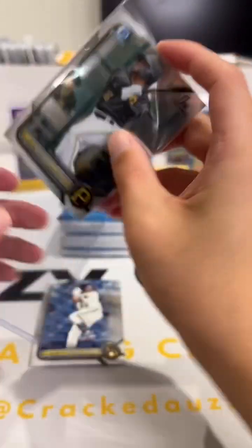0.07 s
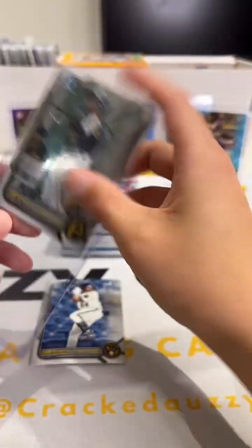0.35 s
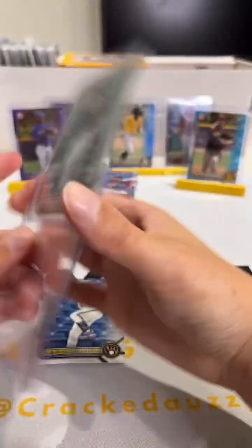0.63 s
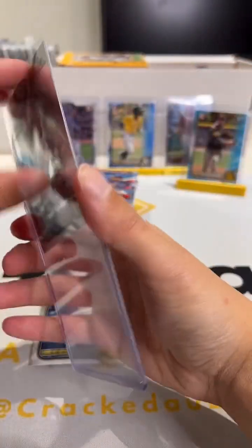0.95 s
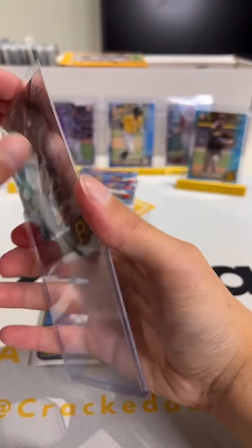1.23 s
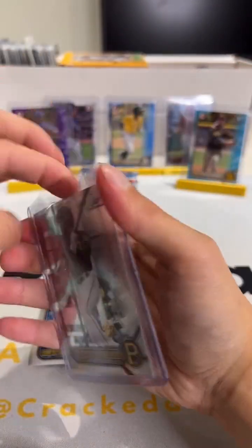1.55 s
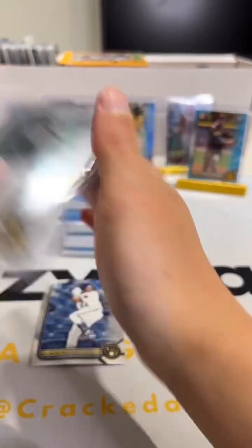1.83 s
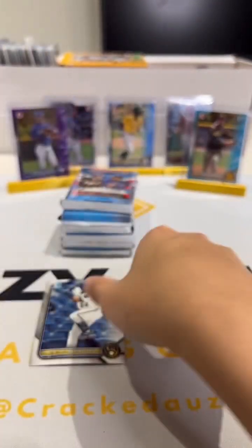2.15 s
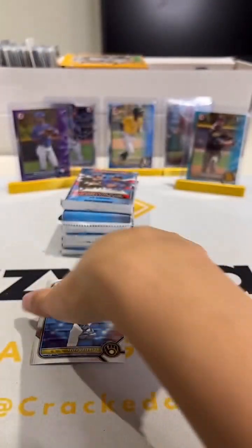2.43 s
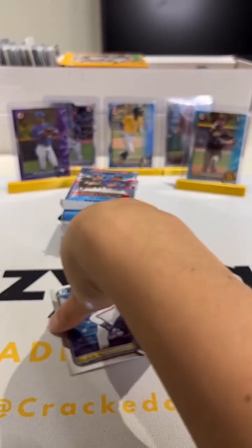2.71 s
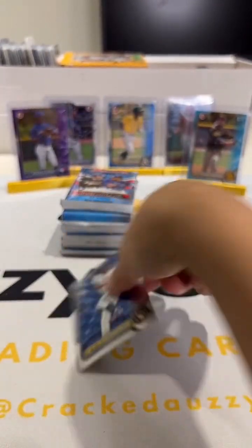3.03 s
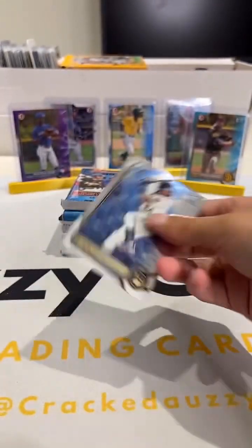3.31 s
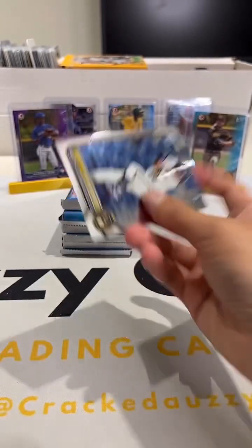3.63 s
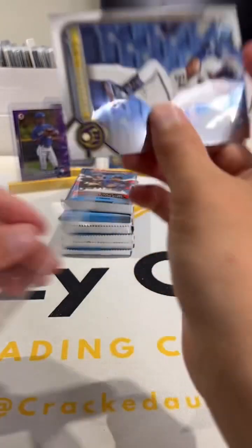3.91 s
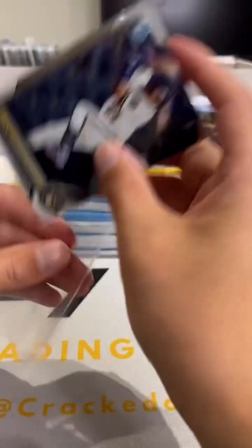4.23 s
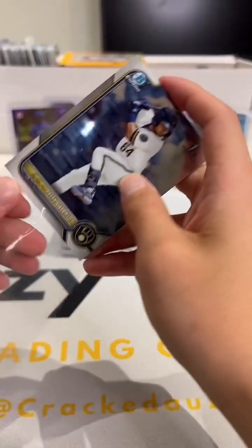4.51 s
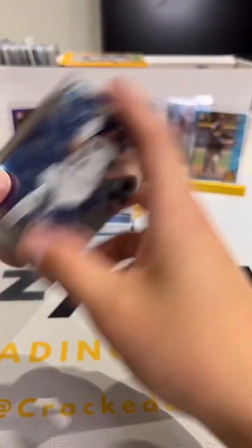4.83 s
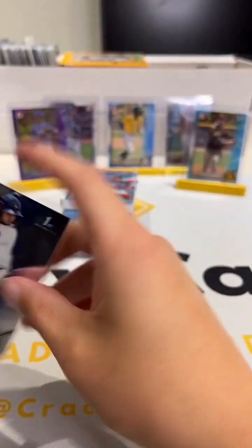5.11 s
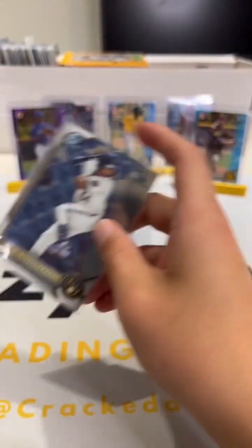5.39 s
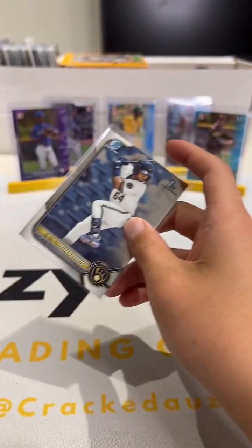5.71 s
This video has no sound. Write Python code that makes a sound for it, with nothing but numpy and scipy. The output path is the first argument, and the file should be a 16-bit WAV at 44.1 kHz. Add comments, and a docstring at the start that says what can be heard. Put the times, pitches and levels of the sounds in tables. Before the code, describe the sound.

A low, steady rumble fills a small room, and everything is heard up close. For the first second or so, a trading card and its plastic rustle softly, with light clicks and a faint squeak. At about 1.4 seconds the card hits the end of a stiff plastic holder with a loud, sharp clack, the loudest sound, followed by a brief scrape. At 2.3 seconds the holder is set down with a hard click, a scrape and a table thump. A hand thumps the table near 2.85 seconds, and the next card slides up with faint squeaks and ticks. From 3.6 to 5.2 seconds, crisp clicks, short scrapes and rustles come in clusters as it is worked into a thin sleeve, busiest around 4.3 and 5.1 seconds. A few soft, dull bumps and faint rubbing close things out by about 5.7 seconds.

```python
"""Soft rustling and light clicks come first, over a low rumble: cards are being sleeved in a small room.
A trading card slides into a stiff plastic holder and hits the end with a loud clack. The holder is put
down and a hand lands on the next card, each thumping the table. That card is picked up and worked into
a thin sleeve. All along, edges click and scrape, and rubbing makes rustles and faint squeaks."""
import sys
import numpy as np
from scipy import signal
from scipy.fft import rfft, irfft
from scipy.io import wavfile
from scipy.ndimage import uniform_filter1d, minimum_filter1d

SR = 44100
rng = np.random.default_rng(int(sys.argv[2]) if len(sys.argv) > 2 else 0)


def put_to_file(sound):
    """Save the sound as 16-bit audio at rate SR, in the file named by the first command-line argument."""
    columns = np.atleast_2d(sound).T  # one column per channel
    safe = np.clip(columns, -1, 1)
    whole_steps = np.round(safe * 32767)
    wavfile.write(sys.argv[1], SR, whole_steps.astype(np.int16))


N = 253575  # samples: 5.75 seconds

# how low and high pitches are balanced in the room's rumble: pitch_hz, gain_db
RUMBLE_TONE = [(15, -69), (25, -7.5), (75, -1), (156, -1), (237, -10), (370, -8), (609, -20), (676, -17),
               (750, -28.5), (1000, -23), (1520, -28.5), (3250, -32.5), (5340, -37.5), (7310, -38),
               (13000, -50.5)]
# how long the room echoes (a fade time is the time to drop by 60 dB): pitch_hz, fade_s
ROOM_FADES = [(100, 0.48), (350, 0.38), (900, 0.37), (2100, 0.49), (6000, 0.33), (12000, 0.43)]
# cards and fingers slide over plastic and table: middle_s, half_length_s, level_db, brightness_db
SLIDES = [(0.095, 0.16, -61.5, 6), (0.251, 0.23, -67, -1), (.372, 0.06, -59.5, 5.5),
          (0.478, 0.0084, -54, 6), (0.795, 0.043, -57.5, 3.5), (0.989, .05, -57.5, 1),
          (1.153, 0.39, -70, 4), (1.397, 0.019, -38, -4.5), (1.728, 0.015, -49, 2), (1.892, 0.028, -58, 2),
          (1.954, 0.024, -61, -1), (2.185, 0.042, -65.5, 3), (2.702, 0.1, -63.5, 1),
          (2.981, 0.1, -57.5, -3.5), (3.167, 0.073, -56, -3.5), (3.308, 0.08, -59.5, -2),
          (3.81, 0.037, -63, -7.5), (4.465, 0.1, -67, 5), (4.584, 0.064, -54, -3.5),
          (4.847, 0.028, -56, -0.5), (5.018, 0.15, -57.5, 7), (5.135, 0.018, -50.5, 0.5),
          (5.256, 0.058, -62, 1), (5.639, 0.027, -64.5, -12.5), (5.72, 0.089, -76.5, -17.5)]
# the tone of sliding: pitch_hz, gain_db
SLIDE_TONE = [(200, -11), (700, 7.5), (1150, 3), (1600, 3), (2100, 4), (3000, 0), (4200, 1.5), (5400, -3),
              (6800, -1), (9000, -5.5), (13000, -11)]
# card and plastic edges click (body is the lower part of the tone):
# start_s, level_db, body_db, chatter_s, pitch_hz
CLICKS = [(0.143, -35, 5.5, 0.0028, 1620), (0.423, -32.5, 6.5, 0.0042, 1120), (0.744, -48, 0, 0.0018, 3950),
          (0.813, -39.5, -4, 0.0023, 4120), (1.055, -44, -18, 0.005, 6700),
          (1.162, -36, -1.5, 0.0019, 1180), (1.226, -41.5, -18, 0.0025, 7100),
          (1.353, -41, -4.5, 0.0025, 2040), (1.536, -26, -1, 0.0037, 2130), (2.263, -19, 3.5, 0.0071, 2000),
          (2.301, -10.5, 5, 0.0023, 1350), (2.846, -27, 4, 0.0077, 3020), (2.856, -23, 7.5, 0.0058, 836),
          (3.306, -33, 15, 0.0042, 1190), (3.335, -34, 9, 0.0012, 1290), (3.585, -32.5, 1.5, 0.0065, 2580),
          (3.625, -22, -12, 0.0033, 7430), (3.911, -23.5, -17.5, 0.0011, 7600),
          (3.917, -25, 2.5, 0.0022, 7400), (4.142, -33, 4, 0.0025, 2030), (4.211, -30, -2.5, 0.0021, 3790),
          (4.31, -27.5, -21, 0.0064, 6600), (4.322, -20.5, 1, 0.0068, 6230), (4.384, -29.5, 18, .002, 910),
          (4.406, -21.5, 7, 0.0016, 1210), (4.703, -39.5, 14.5, .0025, 1000),
          (5.016, -23.5, 4.5, 0.0033, 1810), (5.022, -30, -5, 0.0022, 1020),
          (5.061, -32.5, -25, 0.0049, 6100), (5.076, -29, -6, 0.0021, 1170),
          (5.094, -32.5, -14, 0.0038, 4400), (5.114, -24, 4.5, 0.0014, 3800),
          (5.122, -26, -1, 0.00096, 970), (5.232, -38.5, 12, 0.0028, 846)]
# the tone of a click: pitch_hz, gain_db
CLICK_TONE = [(60, -3.5), (300, 2), (700, 0), (1100, 3), (1900, 1.5), (2500, -1.5), (3100, 4.5), (3850, 0),
              (5200, -1), (7000, -1), (9000, -9.5), (13000, -18)]
# cards and plastic squeak: middle_s, half_length_s, pitch_hz, wobble_fraction, level_db
SQUEAKS = [(0.315, 0.033, 4290, 0.0044, -51), (.559, .021, 4860, .004, -64),
           (1.957, 0.018, 2890, 0.039, -52.5), (2.924, 0.031, 2170, 0.109, -42.5),
           (3.171, 0.047, 2090, 0.027, -51), (5.709, 0.016, 2860, .05, -59)]
# an edge scrapes on plastic: start_s, length_s, level_db, body_db
SCRAPES = [(0.426, 0.056, -49.5, 2.5), (1.468, 0.13, -40, 2), (2.257, 0.087, -38, 5),
           (2.305, .035, -33.5, 14), (3.612, 0.064, -45, -4.5), (3.909, 0.018, -38, 2.5),
           (4.307, 0.1, -31.5, 2.5), (4.557, 0.021, -44, 11.5), (5.102, 0.021, -41.5, 1.5)]
# the tone of a scrape: pitch_hz, gain_db
SCRAPE_TONE = [(180, -33.5), (300, -8.5), (380, -5.5), (610, -24.5), (964, -2), (1080, -8.5), (1750, -18),
               (2910, -12.5), (3860, -3), (4890, -9), (6390, -7), (7850, -6), (13000, -8)]
# the card hits the end of its holder, then bounces: start_s, level_db, accent_hz, accent_db
CLACKS = [(1.3921, -1, 2037, -4.5), (1.4084, -20.5, 2680, 21)]
# the notes the holder rings with: pitch_hz, level_db, fade_s
HOLDER_NOTES = [(300, -20, 0.013), (480, -16, 0.0083), (860, -8, 0.0043), (1190, 10, 0.0051),
                (1880, -9.5, 0.024), (2026, 6, 0.019), (2700, -11, 0.013), (3610, -7, 0.011),
                (6600, -33, .005)]
# nearby surfaces throw the clack back: delay_s, gain_db
CLACK_ECHOES = [(.0185, -24.5), (.0212, -25.5), (.0372, -42.5), (.0605, -43)]
# how strongly the holder sounds into the room: pitch_hz, gain_db
HOLDER_TO_ROOM = [(200, -10.5), (900, -19), (1280, -17.5), (1520, -12), (1800, -1.5), (2050, -10.5),
                  (2300, -9), (2700, -10.5), (4000, -13.5), (9000, 3.5)]
# holder and hands bump the table (flex is its deep bending): start_s, level_db, contact_s, flex_db
THUMPS = [(2.3008, -25.5, 0.00043, -33), (2.313, -27.5, .0017, -9), (2.325, -19.5, 0.0049, 4),
          (2.848, -20, 0.0031, -27.5), (2.857, -18.5, 0.0032, -27), (2.867, -16, 0.0018, -31.5),
          (5.016, -36.5, 0.0074, 7.5), (5.241, -32, 0.004, -13), (5.641, -41, 0.0023, 8.5)]
# the notes the table top rings with: pitch_hz, level_db, fade_s
TABLE_NOTES = [(53.7, -6.5, 0.14), (84, -5.5, 0.044), (123.6, -4, 0.28), (181, 0.5, .11), (272, 2, 0.066),
               (337, -1, 0.043), (396, -29, 0.34), (445.5, -3, 0.067), (587, -20.5, 0.52),
               (680, -19.5, 0.33), (798, -15.5, 0.21)]


def gain(db):
    """Turns decibels into a number to multiply by."""
    return 10 ** (np.asarray(db) / 20)


def normalise(sound):
    """Scales a sound to an average power of 1."""
    return sound / np.sqrt(np.mean(sound ** 2) + 1e-20)


def look_up(curve, hz):
    """Reads between the (pitch, value) points of a curve, with octaves evenly spaced."""
    pitches, values = np.transpose(curve)
    return np.interp(np.log(hz + 1), np.log(pitches + 1), values)


def add(mix, start_s, sound):
    """Mixes a sound in at start_s, dropping whatever falls outside the mix."""
    start = round(start_s * SR)
    sound = sound[max(-start, 0):]
    part = mix[max(start, 0):][:len(sound)]
    part += sound[:len(part)]


def shape_tone(sound, *curves, size=4096):
    """Turns each pitch up or down by the sum of the given (pitch_hz, gain_db) curves."""
    hz = np.fft.rfftfreq(size, 1 / SR)
    cepstrum = irfft(np.log(gain(sum(look_up(curve, hz) for curve in curves))))
    # fold onto the first half, so the filter never rings before the sound arrives
    cepstrum[1:size // 2] *= 2
    cepstrum[size // 2 + 1:] = 0
    response = irfft(np.exp(rfft(cepstrum)))[:size // 2]
    return signal.fftconvolve(sound, response)


def slips(samples, per_s, spread_db):
    """Rubbing is a string of tiny slips, uneven in time and size."""
    happens = rng.random(samples) < per_s / SR
    sizes = gain(spread_db * np.minimum(rng.exponential(1, samples), 4))
    return normalise(happens * sizes * rng.standard_normal(samples))


def ring(notes, length_s):
    """A struck object rings with several pure notes, each fading away."""
    t = np.arange(int(length_s * SR)) / SR
    return sum(gain(db - 60 * t / fade_s) * np.cos(2 * np.pi * hz * t) for hz, db, fade_s in notes)


def room_echo(sound, swell_s):
    """The room's blurred echo swells, then each pitch fades at its own speed."""
    hz, t, bands = signal.stft(rng.standard_normal(SR * 2 // 3), SR, nperseg=256)
    fade = gain(-60 * t / look_up(ROOM_FADES, hz)[:, None])
    tail = signal.istft(bands * fade, SR, nperseg=256)[1]
    tail *= np.minimum(np.arange(len(tail)) / SR / swell_s, 1) ** 2
    return signal.fftconvolve(sound, tail / np.linalg.norm(tail))[:N]


def room_rumble(level_db=-51.5):
    """The room has a low, steady rumble."""
    hz = np.fft.rfftfreq(N, 1 / SR)
    spectrum = rfft(rng.standard_normal(N)) * gain(look_up(RUMBLE_TONE, hz))
    return gain(level_db) * normalise(irfft(spectrum, N))


def card_slides():
    """Cards and fingers slide: each stroke is a swell of fine slips, with ticks where plastic catches."""
    out = np.zeros(N)
    t = np.arange(-SR // 4, SR // 4) / SR
    for middle_s, half_length_s, level_db, brightness_db in SLIDES:
        tilt = [(2200, -brightness_db), (3300, 0), (7000, 0), (9500, brightness_db - 1.5)]
        rubbing = slips(len(t), per_s=6700, spread_db=2.5)
        catches = gain(-16.5) * slips(len(t), per_s=100, spread_db=2)
        rustle = shape_tone(rubbing + catches, SLIDE_TONE, tilt)[:len(t)]
        swell = np.exp(-2 * (t / half_length_s) ** 2)
        add(out, middle_s + t[0], gain(level_db + 6) * rustle * swell)
    return out + gain(-17.5) * room_echo(out, swell_s=0.01)


def edge_clicks(accent_db=10.5, typical_chatter_s=0.0031):
    """An edge makes sharp contact and chatters briefly; the bent plastic brings out one pitch."""
    direct, into_room = np.zeros(N), np.zeros(N)
    t = np.arange(SR // 30) / SR
    for start_s, level_db, body_db, chatter_s, pitch_hz in CLICKS:
        tilt = [(1800, body_db), (3200, 0), (7000, 0), (10000, -1.5 - 0.65 * body_db)]
        accent = [(pitch_hz / 1.25, 0), (pitch_hz, accent_db), (pitch_hz * 1.25, 0)]
        tick = shape_tone(np.ones(1), CLICK_TONE, tilt, accent)
        tick *= gain(level_db + 15 - 0.09 * body_db) / np.linalg.norm(tick)  # thin clicks get a lift
        chatter = rng.standard_normal(len(t)) * np.exp(-t / chatter_s)
        chatter[0] += 0.31 * np.linalg.norm(chatter)  # the first contact is the hardest
        add(direct, start_s, signal.fftconvolve(tick, chatter / np.linalg.norm(chatter)))
        # longer chatter shakes more of the card, so more sound reaches the room
        add(into_room, start_s, tick * chatter_s / typical_chatter_s)
    return direct + gain(-8.5) * room_echo(into_room, swell_s=0.008)


def plastic_squeaks(sag_per_s=0.4):
    """Sticking and slipping settle on one pitch for a moment: thin when steady, raspy when it wobbles."""
    out = np.zeros(N)
    t = np.arange(-SR // 8, SR // 8) / SR
    for middle_s, half_length_s, pitch_hz, wobble_fraction, level_db in SQUEAKS:
        wobble = normalise(uniform_filter1d(rng.standard_normal(len(t)), size=80))
        sinking_hz = pitch_hz * (1 - sag_per_s * t)  # the pitch sinks as the finger slows
        tone = np.sin(2 * np.pi * np.cumsum(sinking_hz * (1 + wobble_fraction * wobble)) / SR)
        swell = np.exp(-2 * (t / half_length_s) ** 2)
        add(out, middle_s + t[0], gain(level_db) * tone * swell)
    return out + gain(-24) * room_echo(out, swell_s=0.011)


def edge_scrapes(fade_db_per_s=142.5):
    """An edge bites hardest as it catches, eases off as it chatters along the plastic, then lets go."""
    out = np.zeros(N)
    t = np.arange(SR // 6) / SR
    for start_s, length_s, level_db, body_db in SCRAPES:
        tilt = [(2000, body_db), (3500, 0), (6800, 0), (9000, -7.5)]
        rubbing = slips(len(t), per_s=2400, spread_db=-3.5)
        rasp = normalise(shape_tone(rubbing, SCRAPE_TONE, tilt)[:len(t)])
        catch = np.clip(t / 0.0002, 0, 1)
        let_go = np.clip((length_s - t) / 0.0049 + 1, 0, 1)
        add(out, start_s, rasp * catch * let_go * gain(level_db - fade_db_per_s * t))
    return out + gain(-10) * room_echo(out, swell_s=0.0051)


def holder_clack():
    """The card hits the end of the stiff holder and bounces once; the shell rings and the room echoes."""
    direct, echoes = np.zeros(N), np.zeros(N)
    bass_cut = [(50, -25.5), (130, -7), (350, 0)]  # a small shell gives off little bass
    for start_s, level_db, accent_hz, accent_db in CLACKS:
        accent = [(accent_hz / 1.25, 0), (accent_hz, accent_db), (accent_hz * 1.25, 0)]
        notes = [(hz, db + look_up(accent, hz), fade_s) for hz, db, fade_s in HOLDER_NOTES]
        shell = gain(level_db) * ring(notes, length_s=0.091)
        t = np.arange(len(shell)) / SR
        shell *= 1 - np.exp(-(t / 0.0002) ** 2)  # the whole shell takes a moment to move
        add(direct, start_s, shape_tone(shell, bass_cut))
    for delay_s, gain_db in CLACK_ECHOES:
        add(echoes, delay_s, gain(gain_db) * direct)
    into_room = shape_tone(direct, HOLDER_TO_ROOM)[:N]
    return direct + echoes + room_echo(into_room, swell_s=0.018)


def table_thumps():
    """Soft bumps make the table ring; a leaning hand bends the top and brings out its deepest notes."""
    out = np.zeros(N)
    t = np.arange(SR // 50) / SR
    for start_s, level_db, contact_s, flex_db in THUMPS:
        flex = [(70, flex_db), (170, 0)]
        notes = [(hz, db + look_up(flex, hz), fade_s) for hz, db, fade_s in TABLE_NOTES]
        push = t * np.exp(-4 * t / contact_s)  # the longer the contact, the duller the thump
        thump = signal.fftconvolve(ring(notes, length_s=0.54), push / push.sum())
        add(out, start_s, gain(level_db) * thump)
    return out + gain(-6) * room_echo(out, swell_s=0.0099)


def scene():
    """All the sounds meet at one nearby microphone."""
    knocks = holder_clack() + edge_clicks() + table_thumps()
    rubbing = edge_scrapes() + card_slides() + plastic_squeaks()
    return (knocks + rubbing + room_rumble())[None]


def record(dry, lowest_hz=42, highest_hz=13250, peak_limit=0.92):
    """The microphone drops the deepest bass, turns down the biggest peaks and cuts the highest treble."""
    bass_cut = signal.butter(3, lowest_hz, "highpass", fs=SR, output="sos")
    thinned = signal.sosfilt(bass_cut, dry)
    peaks = -minimum_filter1d(-abs(thinned), size=90)  # the biggest swing within about 2 ms
    overload = uniform_filter1d(np.maximum(peaks / peak_limit, 1), size=80)
    treble_cut = signal.firwin(601, highest_hz, window=("kaiser", 11), fs=SR)
    return signal.oaconvolve(thinned / overload, treble_cut[None], "same")


dry = scene()
out = record(dry)
put_to_file(out)
```